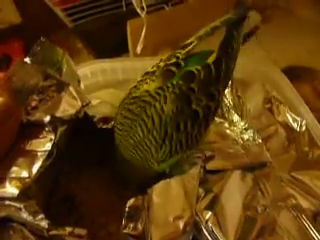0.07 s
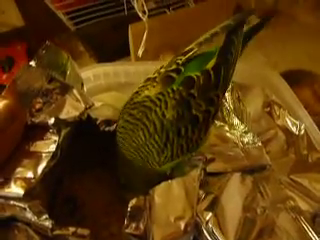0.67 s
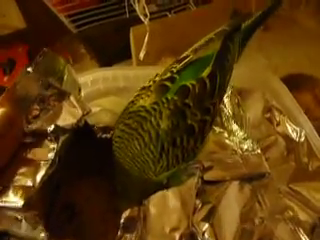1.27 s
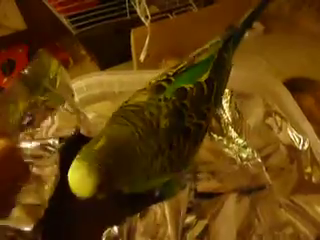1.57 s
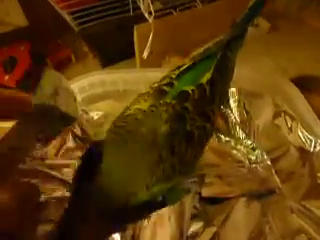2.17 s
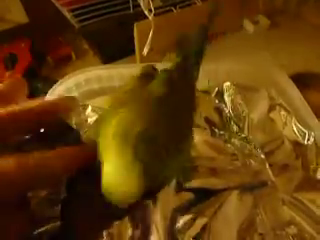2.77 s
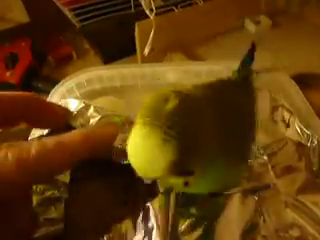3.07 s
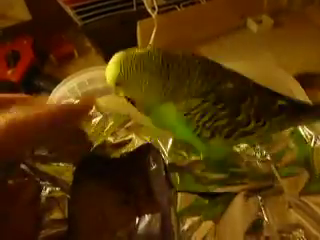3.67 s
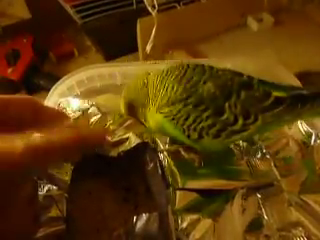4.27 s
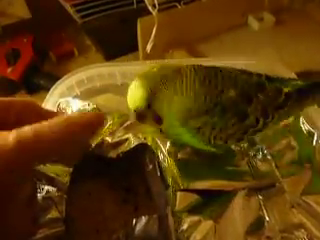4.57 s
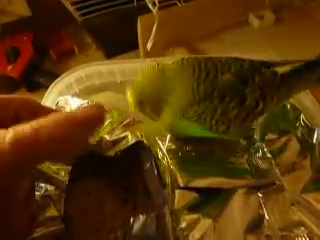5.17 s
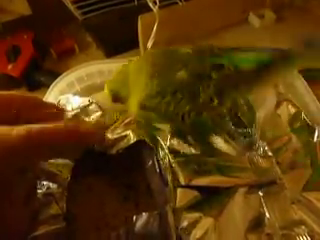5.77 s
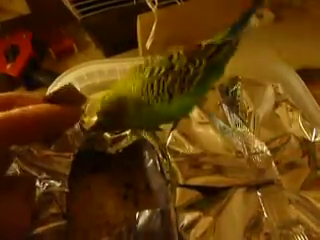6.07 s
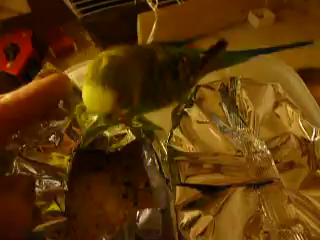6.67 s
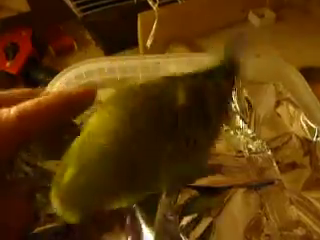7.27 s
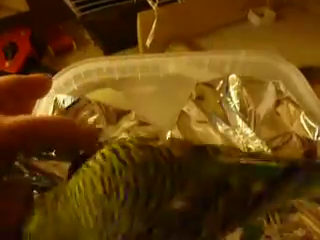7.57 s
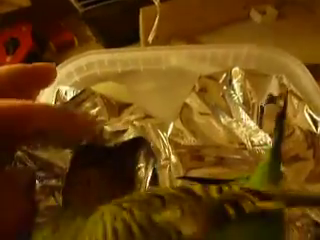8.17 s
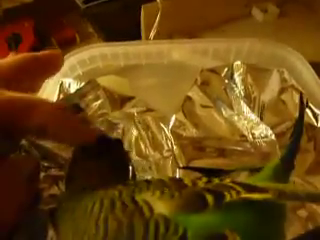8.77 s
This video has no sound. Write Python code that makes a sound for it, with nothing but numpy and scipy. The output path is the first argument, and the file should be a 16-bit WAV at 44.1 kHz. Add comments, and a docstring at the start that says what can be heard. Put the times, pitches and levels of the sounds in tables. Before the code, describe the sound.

A budgie warbles from across a small, quiet room in short slurred whistles, buzzes and rasps. Then, close to the hand-held microphone, another budgie steps and pecks on crumpled foil in a plastic tub, making sharp crackles, rustles and hollow little knocks. About three seconds in, the near bird gives five quick scolding yips. The foil keeps crinkling in bouts, and the distant chatter grows busier near the end.

```python
"""Budgerigar warble comes first, from across a small, quiet room: slurred whistles, buzzes and rasps,
made by the membrane of the syrinx and shaped by the throat. Then, close to the hand-held microphone,
a budgerigar steps about and pecks on crumpled foil in a plastic tub: creases snap, the sheet rustles
and sags, the tub knocks hollowly. About three seconds in, this near bird yips five times at a finger."""
import sys
import numpy as np
from scipy import signal
from scipy.fft import rfft, irfft, next_fast_len
from scipy.io import wavfile
from scipy.ndimage import uniform_filter1d

SR = 44100
rng = np.random.default_rng(int(sys.argv[2]) if len(sys.argv) > 2 else 0)


def unload_wav(signal):
    """Save mono or channel-first audio to the path in sys.argv[1] as 16-bit WAV at rate SR, clipped to [-1, 1]."""
    wavfile.write(
        sys.argv[1],
        SR,
        np.round(np.clip(np.atleast_2d(signal).T, -1, 1) * 32767).astype(np.int16),
    )


N = 389403
TIME = np.arange(N) / SR
EDGE_HZ = 7500  # top of the band at the microphone

# Levels are relative: each source's gain, the tub and the room act on them afterwards.
# creases under beak and claws: (time [s], crack level [dB], thud re crack [dB], edge re crack [dB])
SNAPS = [(1.4121, -27, -5, -7.5), (1.5704, -18.5, -29, -12.5), (1.6621, -27.5, -13, -8),
         (1.689, -29.5, -18, -3.5), (1.712, -35.5, -9, -7.5), (1.8492, -29.5, -18, -25),
         (1.8756, -16, -19.5, -9.5), (2.042, -34.5, 8, -16), (2.1508, -26.5, -14.5, -10),
         (2.2166, -28.5, -7, -20), (2.2326, -41, 20, 11.5), (2.2386, -18, -25, -13),
         (2.2561, -27.5, 0, 1.5), (2.2932, -34, -18, -2), (2.4777, -34.5, 3.5, -0.5),
         (2.6024, -38, -22, -1), (2.6142, -37, -14, 0), (2.7592, -20.5, -12, -10), (2.7993, -34.5, 2, -11),
         (2.8663, -36, 4.5, -0.5), (2.972, -38.5, -7, 0), (2.991, -32.5, 5, -4), (3.009, -29.5, 1, -14),
         (3.037, -37, 4, -1), (3.201, -35, -16, -8), (3.352, -40, 8.5, -10), (3.3708, -32, -8, -8),
         (3.4294, -32, -2, -14), (3.5746, -27.5, 2, -4), (3.5813, -20.5, -11.5, -15),
         (3.6604, -34.5, -22, -25), (3.7016, -39, 4.5, -11), (3.732, -29, 2, -8.5),
         (3.8285, -24.5, -17.5, -6), (4.4046, -40.5, -8, -6), (4.4431, -23, -8, -4.5),
         (4.4713, -26, -9, -4), (4.934, -31.5, -3.5, -8), (4.9397, -27, -16, -28), (5.37, -31, -10, -17),
         (5.379, -29.5, -14, -15), (5.562, -28.5, -15, -7), (5.746, -32, -9, -6), (5.7678, -31.5, -4, -6),
         (5.835, -29.5, -1, 0.5), (5.879, -28.5, 2.5, -13), (5.885, -21.5, -6.5, -0.5),
         (5.892, -22, -9, -8), (5.936, -39.5, 11.5, -5), (5.9528, -28.5, -23, -12), (5.9768, -31, -1, -4.5),
         (6.1245, -37, -11, -11), (6.1465, -25, -3, -0.5), (6.1989, -36, 6, -4), (6.2173, -25.5, -37, -7),
         (6.2478, -36.5, 1, -11), (6.2773, -38, -4, -17), (6.3197, -30.5, -16, -9.5),
         (6.3681, -38.5, 8, -5), (6.4418, -16.5, -23, -12), (6.5116, -24.5, -4, -0.5),
         (6.5212, -35.5, -23, 15), (6.6333, -42.5, 7.5, -3.5), (6.7785, -28.5, -13, -1),
         (6.938, -30.5, -10, -13), (6.9599, -35, 11.5, -20), (6.9812, -42, 16, -15),
         (6.9956, -32.5, -14, 1), (7.0764, -35.5, -5, -18), (7.093, -49, -10, 13.5), (7.1522, -33, 0, 1.5),
         (7.3051, -35.5, 2, -1.5), (7.3349, -32.5, -27, -4), (7.3654, -26.5, 2, -4.5),
         (7.4974, -32, -2.5, -7), (7.576, -30, 4, -10), (7.5818, -30, -12, 5), (7.5972, -33, -27, 2),
         (7.7357, -28, -5.5, -12), (7.952, -34, -20, -6), (7.9644, -24.5, -4.5, -8),
         (8.0086, -31, -16, -13), (8.0273, -35.5, -8.5, -6), (8.0744, -45.5, -6, 13.5),
         (8.4318, -29, -16.5, -7)]
# colour of a foil snap: (frequency [Hz], level [dB])
SNAP_SPECTRUM = [(30, -29.5), (110, -13.5), (220, -5.5), (900, 1), (1400, 0.5), (2300, -0.5), (4000, 0.5),
                 (5300, -3.5), (6500, -12), (7500, -25)]
# steps and tugs on the foil: (time [s], length [s], crumpling level [dB], sag level [dB])
STEPS = [(1.41, 0.082, -42, -38), (1.72, 0.2, -42.5, -49), (1.95, 0.076, -37.5, -44.5),
         (2.04, 0.056, -39.5, -45), (2.158, 0.056, -34.5, -41), (2.23, 0.036, -35.5, -34),
         (2.41, 0.026, -42.5, -34), (2.475, 0.0092, -44, -43), (2.71, 0.063, -36.5, -32),
         (2.81, 0.082, -45, -39), (2.937, 0.011, -38, -41), (2.99, 0.014, -39, -38),
         (3.16, 0.059, -44, -43.5), (3.35, 0.11, -44, -38.5), (3.45, 0.063, -36.5, -33.5),
         (3.565, .03, -47, -32.5), (3.72, .02, -55, -47), (3.808, 0.016, -37.5, -39),
         (4.445, 0.038, -42, -32), (5.47, 0.015, -38, -35.5), (5.557, .012, -45, -37),
         (5.6, 0.031, -42, -34), (5.75, 0.033, -42, -42), (5.885, 0.086, -35, -33.5), (5.97, .15, -46, -47),
         (6.145, 0.015, -40, -51), (6.195, 0.097, -38.5, -49), (6.5, 0.032, -34.5, -48),
         (6.74, 0.083, -42.5, -45), (6.945, 0.14, -39.5, -42), (7.145, 0.087, -37, -40),
         (7.295, 0.028, -41.5, -33.5), (7.366, 0.018, -35, -37), (7.487, 0.013, -39, -52),
         (7.545, .07, -36, -43), (7.775, 0.0098, -41, -37), (7.935, 0.077, -39.5, -34.5),
         (8.52, .055, -37.5, -53)]
# bouts of fidgeting: (start [s], end [s], crumpling level [dB])
BOUTS = [(1.367, 3.053, -49), (3.344, 3.857, -56), (5.351, 6.379, -53), (6.667, 8.068, -49)]
# colour of the tiny creases: (frequency [Hz], level [dB])
CRUMPLE_SPECTRUM = [(200, -15.5), (450, 6), (800, 6), (1500, 3), (2500, 3), (4200, -5), (6000, -13.5),
                    (7500, -36.5)]
# colour of the sagging sheet: (frequency [Hz], level [dB])
SAG_SPECTRUM = [(60, -30), (130, -5), (230, 5), (360, 4), (520, -11), (1000, -32)]
# feet and beak knocking the tub: (time [s], level [dB], ring frequency [Hz])
KNOCKS = [(1.41, -25.5, 191), (1.451, -16.5, 305), (2.151, -16, 290), (2.435, -18.5, 291),
          (2.477, -23, 573), (2.701, -12.5, 340), (2.996, -24, 472), (3.007, -20.5, 210), (3.465, -15, 248),
          (3.571, -17, 232), (4.444, -18, 372), (4.472, -21.5, 180), (4.933, -19, 545), (5.474, -28, 540),
          (5.932, -24, 306), (6.953, -23, 530), (7.15, -22, 610), (7.965, -20, 542)]
# hollow of the tub and foil tent: (frequency [Hz], width [Hz], level [dB])
TUB_MODES = [(355.3, 12, -5), (514.6, 39, 0), (810, 110, -7), (2220, 59, -15), (3650, 90, -12)]
# yips at the microphone: (time [s], length [s], five evenly spaced pitches [Hz], level [dB],
# octave re fundamental [dB], swell [0 flat to 2 pointed], roughness [0-1])
YIPS = [(3.001, 0.021, 1280, 1627, 2130, 2250, 2170, -21.5, -1, 0.36, 0.28),
        (3.075, .026, 1600, 1450, 1900, 2240, 2030, -26, 7.5, 0.65, 0.59),
        (3.158, 0.027, 1500, 1580, 1866, 2086, 2240, -27.5, 9, 0.74, 0.6),
        (3.247, 0.027, 1370, 1790, 1780, 2260, 2120, -25.5, 9, 1.6, 0.42),
        (3.333, 0.019, 1840, 1730, 1600, 1495, 1370, -28, 7.5, 0.63, 0.68)]
# throat resonances in a yip: (frequency [Hz], width [Hz], level [dB])
YIP_MODES = [(2130, 130, -0.5), (4750, 63, -4)]
# far whistles: (time [s], length [s], start pitch [Hz], middle pitch [Hz], end pitch [Hz], level [dB])
WHISTLES = [(0.08, 0.036, 2664, 2390, 2300, -31), (0.128, 0.03, 2240, 2030, 1920, -34.5),
            (0.142, 0.03, 3970, 3320, 2850, -34.5), (0.273, 0.018, 1710, 1600, 1810, -43.5),
            (.325, 0.047, 3690, 2930, 2570, -42.5), (0.438, 0.022, 2180, 2090, 2520, -39.5),
            (0.458, 0.075, 3030, 3260, 3650, -46), (0.661, 0.057, 1688, 1050, 1450, -45),
            (0.793, 0.031, 2680, 2200, 1780, -40), (1.117, 0.057, 2810, 3136, 2980, -33.5),
            (1.174, .028, 2110, 2017, 1710, -41), (1.337, 0.027, 3590, 3500, 3750, -37.5),
            (1.358, 0.061, 2240, 2930, 2955, -32), (1.433, 0.027, 2875, 2570, 2310, -35.5),
            (2.374, 0.025, 3050, 3690, 3880, -29), (2.394, .045, 2580, 2560, 2350, -39.5),
            (2.629, 0.096, 2660, 2450, 3280, -41.5), (2.737, 0.02, 3330, 2770, 2250, -35),
            (2.918, 0.052, 3300, 2890, 2730, -47), (3.464, 0.035, 2580, 2530, 2200, -38.5),
            (3.53, 0.029, 4100, 3450, 3540, -35.5), (3.741, .036, 2200, 2050, 2090, -44),
            (3.753, 0.027, 3230, 2994, 3050, -33.5), (3.789, .026, 3140, 3300, 3320, -43),
            (4.03, 0.044, 5100, 3890, 3320, -36.5), (4.059, 0.045, 2423, 2694, 3550, -34),
            (4.106, 0.027, 1720, 1506, 1420, -44.5), (4.599, 0.092, 1560, 1655, 1520, -54.5),
            (4.808, 0.094, 1652, 1704, 1530, -44), (5.106, 0.068, 2366, 2387, 1760, -33.5),
            (5.177, 0.047, 3720, 3690, 3740, -35.5), (5.327, .05, 2444, 2138, 2510, -34),
            (5.383, .056, 3010, 2984, 2450, -32), (5.42, .047, 2650, 2280, 2850, -21.5),
            (6.74, 0.033, 1730, 1853, 1720, -44), (6.819, 0.048, 2645, 2210, 1690, -33),
            (6.883, .045, 4210, 3510, 2630, -36), (7.02, 0.029, 1566, 1693, 1260, -34.5),
            (8.085, 0.044, 1810, 1673, 1260, -35), (8.109, 0.033, 1943, 2440, 3250, -30.5),
            (8.135, 0.012, 3750, 3930, 3550, -22), (8.157, 0.031, 1975, 1907, 1680, -34.5),
            (8.203, 0.056, 1926, 1780, 1395, -39.5), (8.364, 0.021, 4160, 3920, 3650, -25.5),
            (8.503, 0.017, 1920, 1974, 1830, -25.5), (8.516, 0.029, 1230, 1150, 1177, -32.5),
            (8.575, 0.026, 1780, 1505, 1340, -35), (8.61, 0.036, 2940, 3354, 3670, -33.5),
            (8.637, 0.048, 1770, 1920, 2120, -41), (8.697, 0.031, 2870, 2630, 1900, -28.5),
            (8.74, 0.052, 3355, 2680, 2400, -27), (8.751, 0.036, 4410, 3930, 3620, -29.5),
            (8.797, 0.035, 3220, 3065, 4430, -25.5)]
# the throat favours 2-4 kHz, so low whistles have a strong octave: (pitch [Hz], octave level [dB])
WHISTLE_OCTAVE = [(1150, -3), (1550, 1), (2000, -9), (2280, -24.5), (2650, -9), (3200, -26), (4000, -19.5)]
# far rasps and buzzes:
# (time [s], length [s], pulse rate [Hz], level [dB], roughness [about 0-1], tilt [dB/octave])
RASPS = [(0.053, .03, 937, -30, 0.77, -3), (0.168, 0.053, 1244, -22.5, 0.77, 8),
         (0.519, 0.03, 865, -38.5, 0.57, -9), (0.566, 0.046, 753, -36, 0.69, -9.5),
         (0.721, 0.027, 1258, -26, .73, -1.5), (0.866, 0.034, 1209, -25.5, 0.73, 1),
         (1.499, 0.027, 814, -34, 0.84, -8.5), (2.425, 0.017, 1100, -28, 1.01, -1.5),
         (2.54, 0.033, 622, -33.5, 0.62, -6), (4.729, 0.057, 867, -31.5, 0.84, -2.5),
         (4.869, 0.055, 864, -28.5, 1.03, 3), (5.083, 0.02, 957, -30.5, 0.8, -4),
         (5.21, 0.046, 763, -38.5, 0.73, -1), (5.585, 0.048, 699, -39.5, 0.67, -1),
         (7.219, 0.023, 555, -34, .13, 0), (7.312, 0.07, 608, -42, 0.49, -5),
         (7.383, 0.047, 331, -32.5, 0.12, 1), (7.476, 0.038, 997, -35, 0.57, -5),
         (7.539, .028, 740, -43.5, 0.4, 1), (7.595, 0.03, 743, -36, 0.52, -1),
         (7.705, .044, 417, -36, 0.18, 1.5), (7.828, 0.036, 418.4, -39, .14, -4),
         (7.964, 0.048, 607, -38.5, 0.6, -3), (8.254, 0.063, 950, -36.5, 0.47, -8),
         (8.293, 0.042, 2443, -24, 0.1, -0.5), (8.317, .05, 1203, -30.5, 0.77, -0.5),
         (8.369, 0.061, 1228, -34, 0.77, -3), (8.488, 0.025, 862, -29, 0.79, -7),
         (8.591, 0.029, 738, -33.5, 0.65, -7.5), (8.755, 0.079, 1178, -37.5, 0.87, .5)]
# colour of the throat in a rasp: (frequency [Hz], level [dB])
RASP_THROAT = [(400, -44), (750, -22), (1150, -3.5), (1800, -3), (2600, 2), (3500, -0.5), (4300, -2),
               (5100, -1.5), (6200, -12.5), (7500, -24.5)]
# beak and throat damping the highest overtones: (frequency [Hz], gain [dB])
BEAK = [(1000, 0), (5200, -1), (6200, -3.5), (7500, -13.5)]
# decay of the small room: (frequency [Hz], time to fall 60 dB [s])
ROOM_DECAY = [(150, 0.19), (600, 0.16), (2000, 0.23), (4000, 0.22), (7500, 0.2)]
# colour of the room air: (frequency [Hz], level [dB])
AIR_SPECTRUM = [(20, -25.5), (70, -4.5), (250, 6.5), (500, 2.5), (1000, -4), (2500, -5), (4500, -11),
                (6500, -16.5), (7500, -35.5)]
# rumble of the hand on the microphone: (time [s], level [dB])
HANDLING_LEVELS = [(0.0, -53), (0.29, -63.5), (2.14, -57), (2.21, -49), (2.33, -57.5), (3.34, -60.5),
                   (3.56, -55.5), (4.08, -66), (4.5, -57), (4.52, -63), (5.75, -59.5), (5.95, -47),
                   (5.98, -63.5), (6.88, -64.5), (7.21, -45), (7.3, -57.5), (8.63, -60.5), (8.83, -64)]
# colour of that rumble: (frequency [Hz], level [dB])
HANDLING_SPECTRUM = [(20, -17), (45, -2.5), (80, 4.5), (130, 2.5), (250, -20), (600, -56.5)]


def foil_snaps(rattle=0.11, rattle_s=0.0028, shiver=0.011, shiver_s=0.019, gain_db=1.5):
    """A crease gives slightly, then flips with one click; its neighbours rattle and the sheet shivers."""
    out, t = np.zeros(N), np.arange(3000) / SR
    hz = np.fft.rfftfreq(2048, 1 / SR)
    centres_hz = np.array([330, 1050, 2800, 5300])  # thud, body, crack, edge
    widths_hz = np.array([500, 1100, 2500, 2200])
    for s, db, thud_db, edge_db in list(SNAPS) + foil_ticks():
        body_db = 0.56 * thud_db - 1
        bands_db = db + gain_db + np.array([thud_db - 2.5, body_db, 0, edge_db])
        density = np.c_[centres_hz, bands_db - 10 * np.log10(2 * widths_hz / SR)]
        click = shortest_click(at_hz(density, hz) + at_hz(SNAP_SPECTRUM, hz) + foil_facet(hz))
        neighbours = unit_rms(rng.standard_normal(len(t)) * (rng.random(len(t)) < .15))
        flips = neighbours * (rattle * np.exp(-t / rattle_s) + shiver * np.exp(-t / shiver_s))
        flips[0] = 1  # the main flip
        click *= np.sqrt(.006 * SR) / np.linalg.norm(flips)
        add(out, s, signal.fftconvolve(flips, click))
        add(out, s - rng.uniform(.0005, .0015), 0.22 * click)  # the give just before it
    return out


def foil_ticks(per_s=9, tries=60, edge_db=-8):
    """Small creases snap at random while the bird fidgets; gives rows like those of SNAPS."""
    rows = []
    for start, end, _ in BOUTS:
        for when, size, thud, chance in rng.random((tries, 4)):
            if chance < per_s * (end - start) / tries:
                crack_db = -44.5 + 1.5 * (2 * size - 1)
                thud_db = 1 + 9 * (2 * thud - 1)
                rows.append((start + when * (end - start), crack_db, thud_db, edge_db))
    return rows


def foil_facet(hz, ripple_db=6, count=26):
    """Each facet of foil has its own irregular peaks and dips, in dB."""
    ripple = np.interp(hz, np.linspace(0, EDGE_HZ, count), rng.uniform(-1, 1, count))
    return ripple_db * (ripple - .15)


def foil_rustle(swarm_per_s=600, spread_db=6, crumple_gain_db=-0.5, sag_gain_db=-5):
    """Swarms of tiny creases, dull or bright, and the soft sag of the sheet under the bird's weight."""
    crumple, sag = np.zeros(N), np.zeros(N)
    fidgets = [(start, end - start, db, db - 2) for start, end, db in BOUTS]
    for s, length, crumple_db, sag_db in list(STEPS) + fidgets:
        load = foil_load(s, length)
        crumple = np.maximum(crumple, load * amp(crumple_db + crumple_gain_db))
        sag = np.maximum(sag, load * amp(sag_db + sag_gain_db))
    grains = 0
    for tilt_db in (-4, 0, 4):
        sizes = amp(spread_db * np.minimum(rng.exponential(1, N), 4)) * rng.choice([-1, 1], N)
        grains += coloured(sizes * sparse(N, swarm_per_s), CRUMPLE_SPECTRUM, tilt_db)
    flex = coloured(rng.standard_normal(N) * amp(3 * wander(N, hz=30)), SAG_SPECTRUM)
    return unit_rms(grains) * crumple + flex * sag


def foil_load(s, length, press_s=0.016, relax_s=0.021):
    """The foil gives quickly under a step, holds, then settles more slowly."""
    rise = np.clip((TIME - s) / press_s + 1, 0, 1)
    return rise * np.exp(-np.maximum(TIME - s - length, 0) / relax_s)


def tub_knocks(ring_s=0.0063, rise_s=0.0021, upper_ratio=1.4, upper_db=-9, gain_db=-2):
    """Struck by a foot or the beak, the thin tub gives a short, hollow ring."""
    out, t = np.zeros(N), np.arange(3000) / SR
    for s, db, hz in KNOCKS:
        ring = np.sin(2 * np.pi * hz * t) + amp(upper_db) * np.sin(2 * np.pi * hz * upper_ratio * t)
        add(out, s, amp(db + gain_db) * ring * np.exp(-t / ring_s) * (1 - np.exp(-t / rise_s)))
    return out


def yips(third_db=-12, fourth_db=-21):
    """Short, sharp scolding notes with a strong octave, ringing in the near bird's throat."""
    out = np.zeros(N)
    for s, length, *pitches, db, octave_db, sharp, rough in YIPS:
        u = np.linspace(0, 1, round(length * SR))
        glide = uniform_filter1d(np.interp(u, np.linspace(0, 1, len(pitches)), pitches), size=120)
        hz = glide * (1 + .11 * rough * wander(len(u), hz=900))
        tone = syrinx(hz, amp([0, octave_db, third_db, fourth_db]))
        breath = swell(u, crest=0.53, sharp=sharp) * (1 + 0.4 * rough * wander(len(u), hz=500))
        add(out, s, amp(db) * np.sqrt(2) * unit_rms(breath) * tone)
    return resonate(out, YIP_MODES)


def whistles(jitter=.2, flutter=.008, shimmer=0.56, fray=1.56):
    """Slurred notes from an unsteady membrane: held and rising ones are cleaner, falling ones fray."""
    out = np.zeros(N)
    for s, length, start, middle, end, db in WHISTLES:
        u = np.linspace(0, 1, round(length * SR))
        fall_octaves = np.clip(np.log2(start / end), 0, .5)
        rough = 0.18 + .25 * fall_octaves
        glide = np.polyval(np.polyfit([0, .5, 1], [start, middle, end], 2), u)
        hz = glide * (1 + jitter * rough * wander(len(u), hz=380) + flutter * wander(len(u), hz=110))
        octave_db = at_hz(WHISTLE_OCTAVE, middle)
        tone = syrinx(hz, amp([0, octave_db, octave_db - 11]))
        unsteady = shimmer * wander(len(u), hz=200) + fray * wander(len(u), hz=900)
        breath = swell(u, crest=0.58, sharp=0.34) * (1 + rough * unsteady)
        add(out, s, amp(db) * np.sqrt(2) * unit_rms(breath) * tone)
    return out


def rasps(jitter=0.1512, arch=0.0804, drift=0.036, sag=0.046, hiss=1.41, catch_db=3):
    """Uneven pulses and breath noise pass through the throat; the pitch sags and the breath catches."""
    out = np.zeros(N)
    for s, length, rate, db, rough, tilt_db in RASPS:
        u = np.linspace(0, 1, round(length * SR))
        waver = arch * np.sin(np.pi * u) + drift * wander(len(u), hz=61)
        waver += jitter * wander(len(u), hz=248)
        hz = rate * (1 + sag * (.5 - u) + rough * waver)
        pulses = unit_rms(syrinx(hz, np.ones(int(EDGE_HZ / rate)), smear=0.98))
        noise_share = np.clip(hiss * rough ** 2.5, 0, 1)
        drive = np.sqrt(1 - noise_share) * pulses + np.sqrt(noise_share) * rng.standard_normal(len(u))
        breath = swell(u, crest=0.35, sharp=0.66) * amp(catch_db * wander(len(u), hz=180))
        add(out, s, amp(db) * unit_rms(coloured(drive, RASP_THROAT, tilt_db) * breath))
    return out


def syrinx(hz, gains, smear=0):
    """Harmonics of a vibrating membrane on a pitch curve; smear spreads each pulse over its cycle."""
    phase = 2 * np.pi * np.cumsum(hz) / SR
    lags = 2 * np.pi * smear * rng.random(len(gains))
    return sum(gain * amp(at_hz(BEAK, k * abs(hz))) * np.sin(k * phase + lag)
               for k, (gain, lag) in enumerate(zip(gains, lags), 1))


def swell(u, crest, sharp):
    """Breath of one note: rises to its crest and falls away as u runs from 0 to 1."""
    return abs(np.sin(np.pi * np.interp(u, [0, crest, 1], [0, .5, 1]))) ** sharp


def resonate(x, modes):
    """A hollow, tub or throat, rings along with the sound in it."""
    return x + sum(amp(db) * signal.lfilter(*signal.iirpeak(hz, hz / width, SR), x)
                   for hz, width, db in modes)


def across_room(x, directions=3, turn_s=.45):
    """The far bird turns its head, so the reflections at the microphone change from note to note."""
    reflections = 0
    for k in range(directions):
        facing = np.cos(np.pi * (TIME / turn_s + k / directions)) * np.sqrt(2 / directions)
        reflections += room(x * facing, early_db=-2.5, tail_db=-5, early_s=0.0041)
    return amp(-0.5) * x + reflections


def room(x, early_db, tail_db, early_s=0.0047):
    """Reflections from nearby surfaces, then the short diffuse tail of a small room."""
    t = np.arange(SR // 2) / SR
    taps = rng.choice([-1., 1.], len(t)) * sparse(len(t), per_s=3000) * (t > .005)
    hz, frame_s, spectra = signal.stft(taps, SR, nperseg=256)
    decay = amp(-60 * frame_s / at_hz(ROOM_DECAY, hz)[:, None])
    tail = signal.istft(spectra * decay, SR, nperseg=256)[1][:len(t)]
    early = rng.standard_normal(len(t)) * sparse(len(t), per_s=1500) * (t > .001)
    early *= np.exp(-t / early_s)
    echo = amp(early_db) * early / np.linalg.norm(early) + amp(tail_db) * tail / np.linalg.norm(tail)
    return signal.oaconvolve(x, echo)[:N]


def background(air_db=-51.5, rumble_gain_db=-1):
    """Faint room air and the rumble of a hand-held microphone."""
    air = amp(air_db) * coloured(rng.standard_normal(N), AIR_SPECTRUM)
    handling = amp(np.interp(TIME, *np.transpose(HANDLING_LEVELS)) + rumble_gain_db)
    return air + handling * coloured(rng.standard_normal(N), HANDLING_SPECTRUM)


def amp(db):
    """Decibels to gain."""
    return 10 ** (np.asarray(db) / 20)


def unit_rms(x):
    """Scales to rms 1."""
    return x / np.sqrt(np.mean(x ** 2) + 1e-20)


def at_hz(points, hz):
    """Reads a table on a log-frequency axis."""
    f, value = np.transpose(points)
    return np.interp(np.log(hz + 1), np.log(f + 1), value)


def add(mix, s, sound):
    """Mixes a sound in at time s."""
    part = mix[max(round(s * SR), 0):][:len(sound)]
    part += sound[:len(part)]


def coloured(x, points, tilt_db=0):
    """Filters x by a spectrum, tilted per octave above 1 kHz; comes out at rms 1."""
    size = next_fast_len(len(x), True)
    hz = np.fft.rfftfreq(size, 1 / SR)
    gain = amp(at_hz(points, hz) + tilt_db * np.log2(np.maximum(hz, 1000) / 1000))
    return unit_rms(irfft(rfft(x, size) * gain, size)[:len(x)])


def sparse(size, per_s):
    """Random impulses, on average per_s a second."""
    return rng.random(size) < per_s / SR


def wander(size, hz):
    """Smooth random motion of rms about 1, moving up to about hz times a second."""
    f = np.fft.rfftfreq(next_fast_len(size + 4096), 1 / SR)
    spectrum = rng.standard_normal(len(f)) + 1j * rng.standard_normal(len(f))
    return unit_rms(irfft(spectrum / (1 + (f / hz) ** 4)))[:size]


def shortest_click(db):
    """The minimum-phase click that has this spectrum."""
    log_gain = np.log(amp(np.r_[db, db[-2:0:-1]]))
    return np.fft.ifft(np.exp(np.conj(signal.hilbert(log_gain)))).real


def scene():
    """Foil and yips are close to the microphone and almost dry; the far warble carries much more room."""
    foil = amp(-0.5) * resonate(foil_snaps() + tub_knocks() + foil_rustle(), TUB_MODES)
    scolding = yips()
    close = foil + room(foil, early_db=-13, tail_db=-14)
    close += scolding + room(scolding, early_db=-17, tail_db=-16)
    warble = across_room(whistles() + rasps())
    return (close + warble + background())[None]


def record(dry, ceiling=.8):
    """The microphone chain rounds off the sharpest peaks and cuts the treble above EDGE_HZ."""
    limited = dry / (1 + (dry / ceiling) ** 4) ** .25
    lowpass = signal.firwin(201, EDGE_HZ, window=("kaiser", 8), fs=SR)
    return signal.oaconvolve(limited, lowpass[None], "same")


dry = scene()
out = record(dry)
unload_wav(out)
```